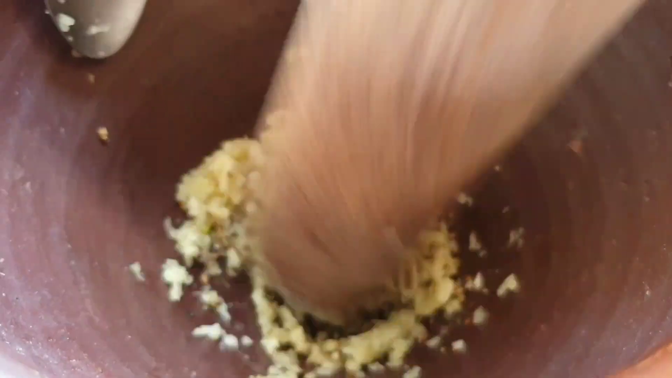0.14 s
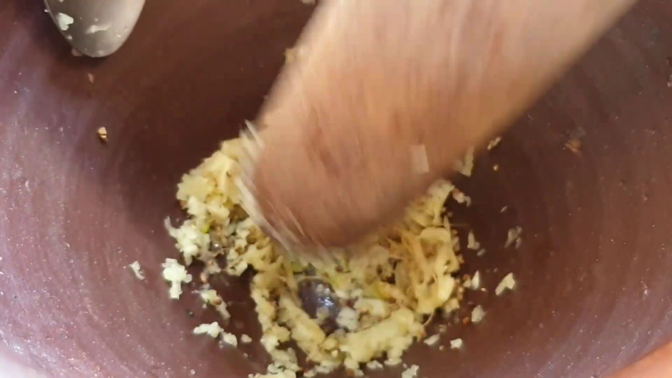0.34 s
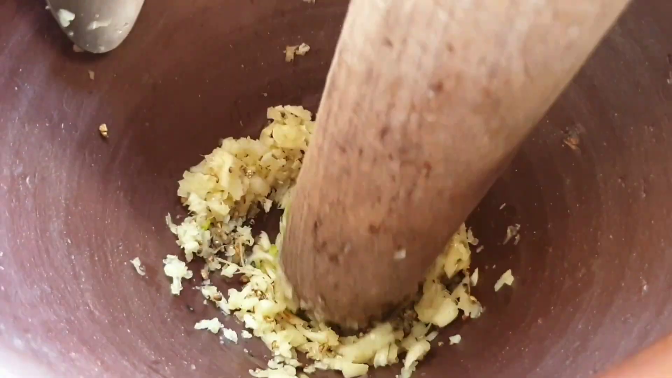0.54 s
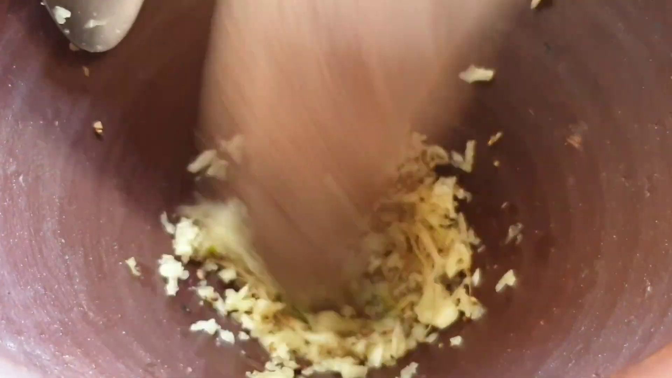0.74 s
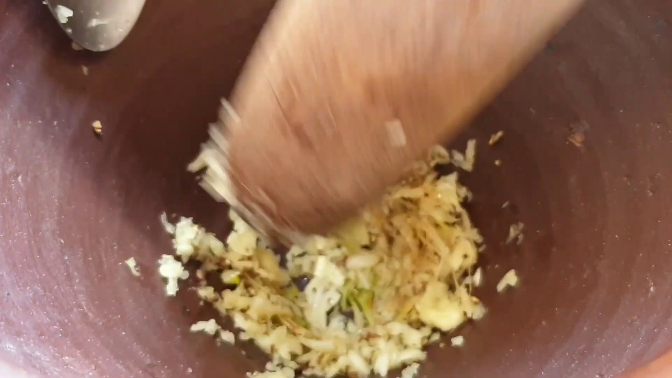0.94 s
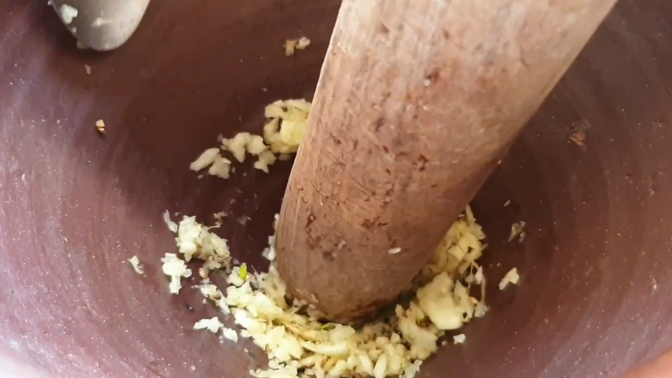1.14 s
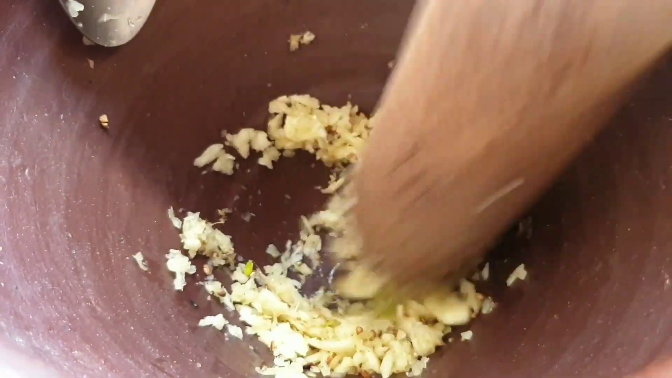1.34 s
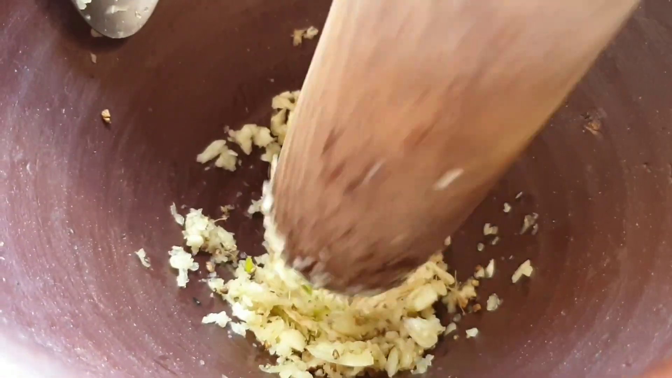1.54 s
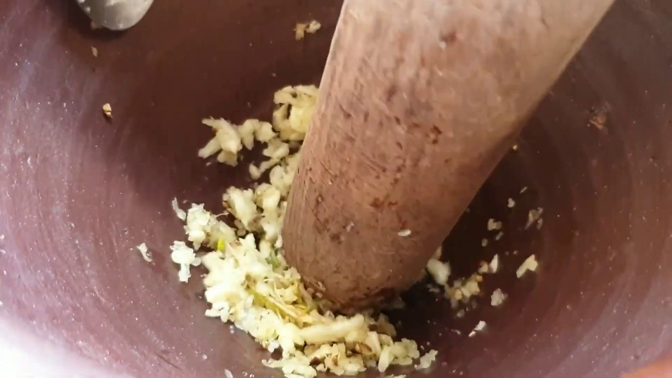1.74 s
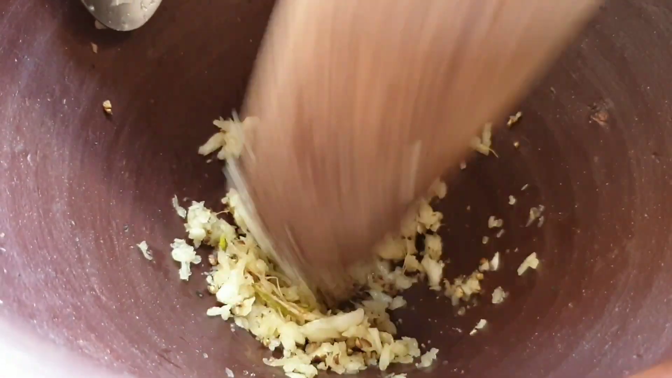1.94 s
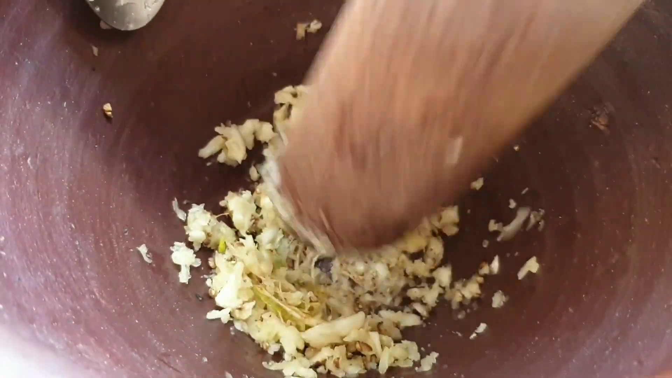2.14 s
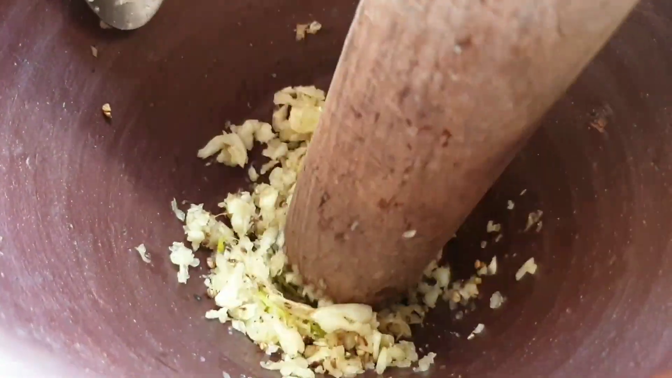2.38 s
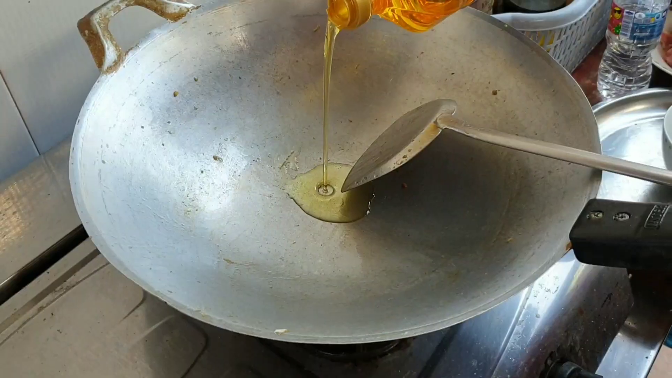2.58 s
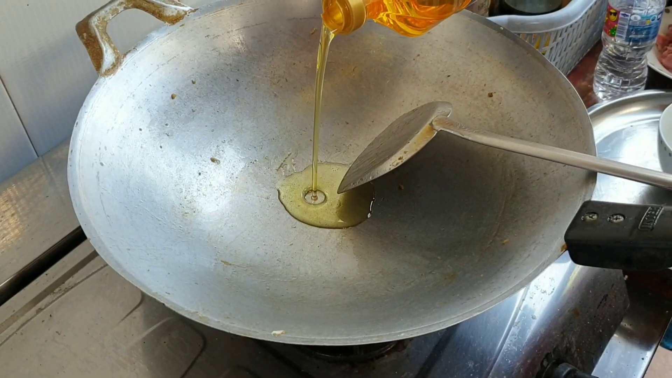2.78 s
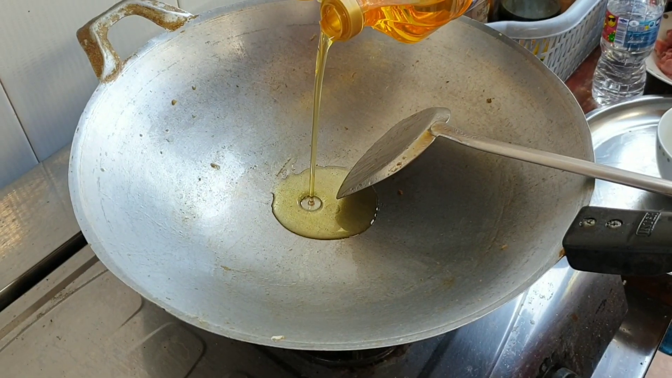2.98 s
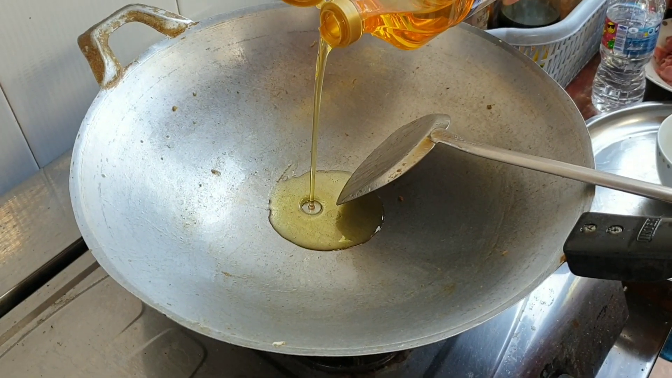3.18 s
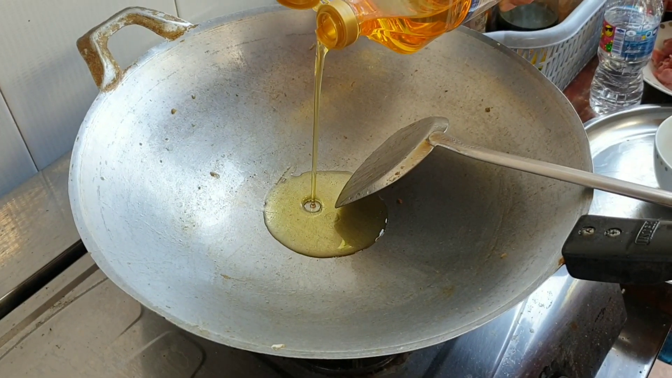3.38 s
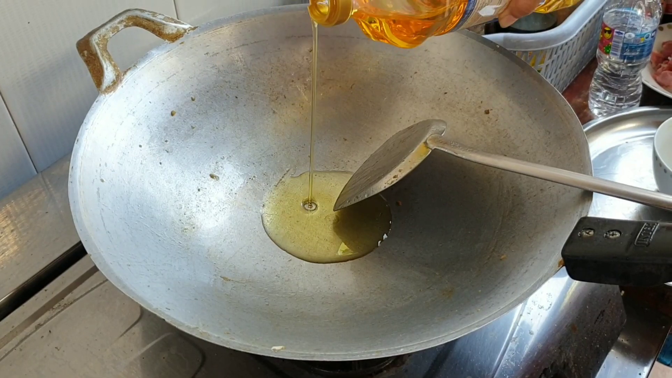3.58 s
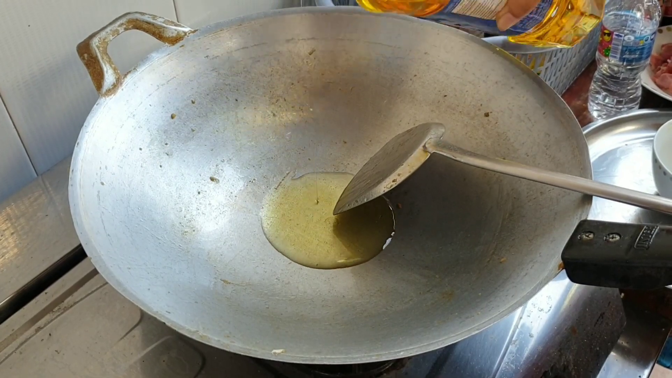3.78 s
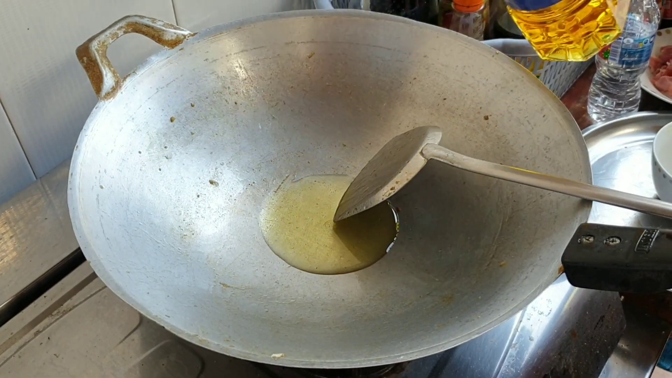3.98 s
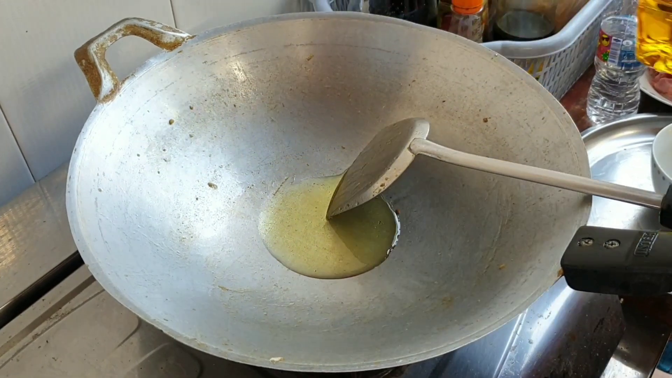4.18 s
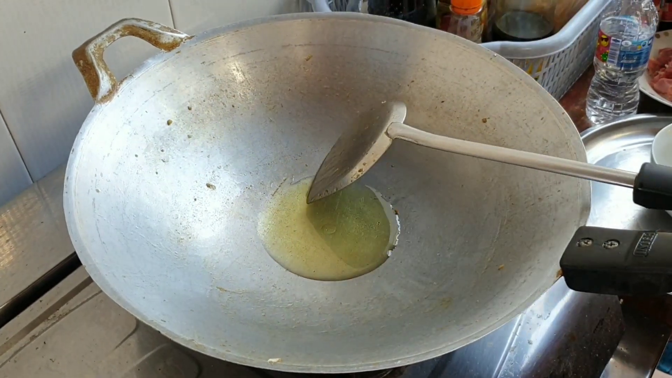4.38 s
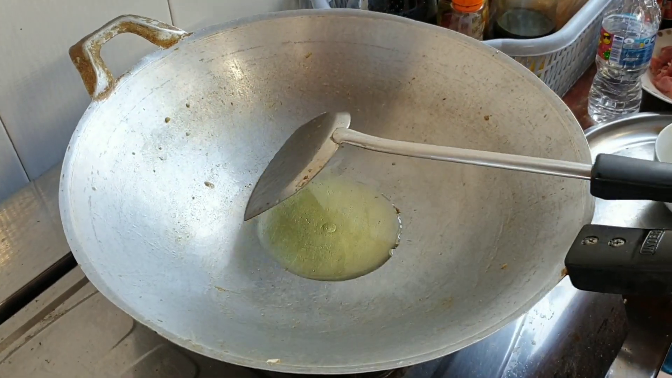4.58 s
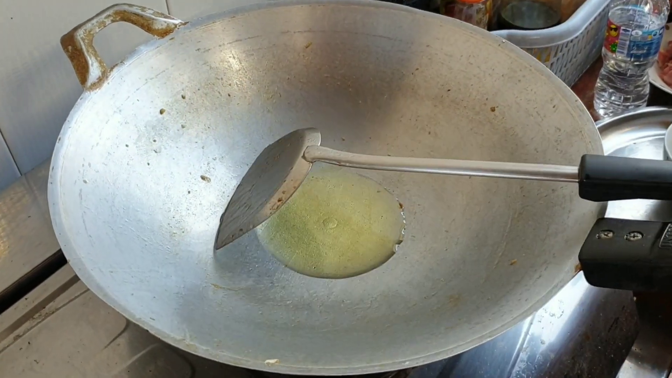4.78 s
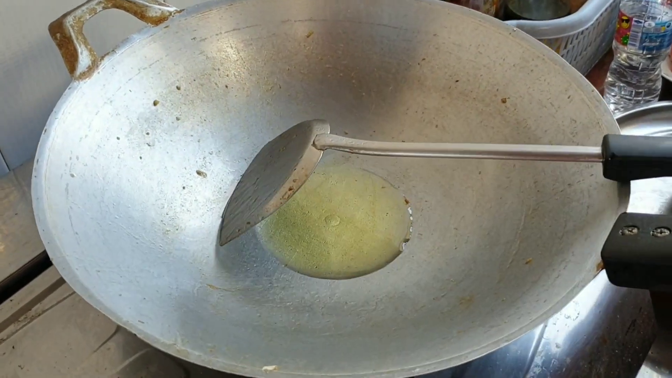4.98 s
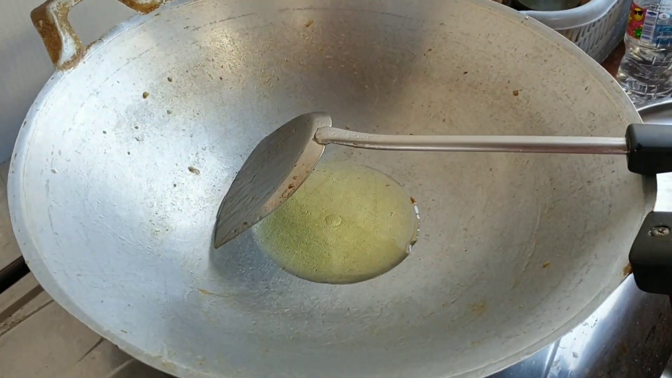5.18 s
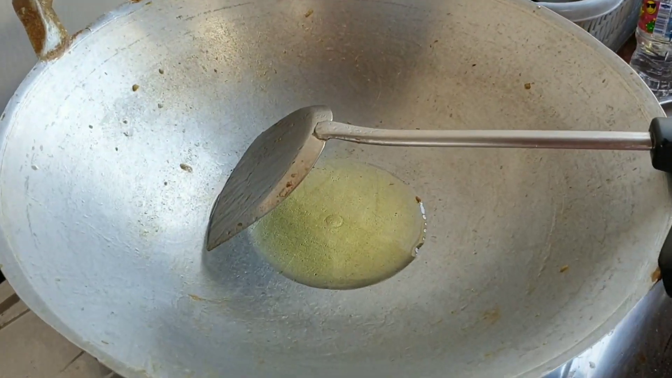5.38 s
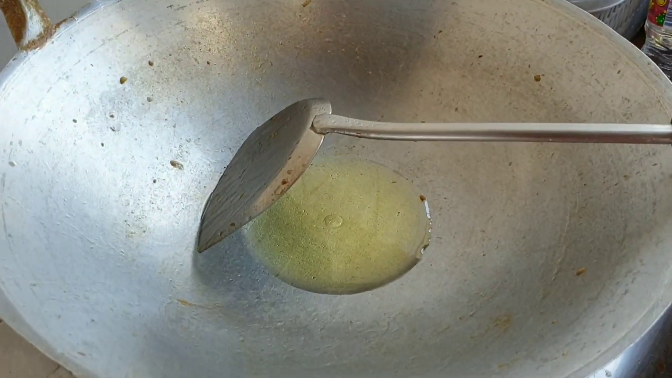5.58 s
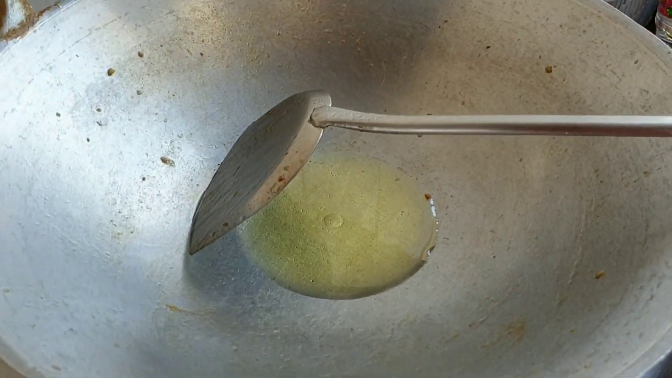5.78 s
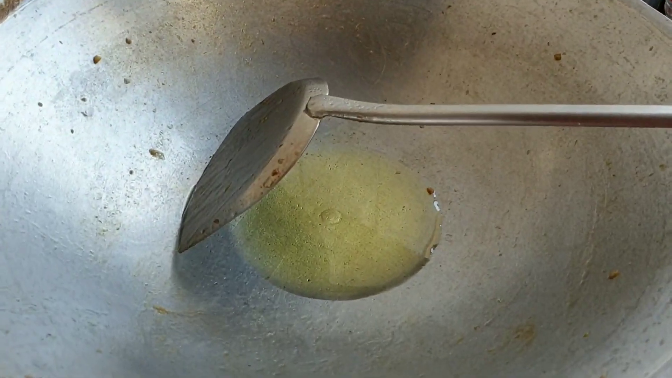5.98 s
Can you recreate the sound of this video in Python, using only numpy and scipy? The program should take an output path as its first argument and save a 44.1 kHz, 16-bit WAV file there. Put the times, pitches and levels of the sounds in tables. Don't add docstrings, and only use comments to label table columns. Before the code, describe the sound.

Nine regular pestle blows land in a clay bowl, woody and thudding, shaking the counter while garlic bursts and squirts. A sudden cut leaves distant traffic, a faint motor hum and lively sparrow chatter with yard echoes. Light ticks of a spatula on thin metal follow, then two loud clattering knocks and a last short one. The kitchen is dry, the stereo microphone near.

```python
import sys
import numpy as np
from scipy import signal
from scipy.fft import rfft, irfft, next_fast_len
from scipy.io import wavfile
from scipy.ndimage import map_coordinates

SR = 44100
rng = np.random.default_rng(int(sys.argv[2]) if len(sys.argv) > 2 else 0)


def materialize(psi):
    bounded = np.clip(np.atleast_2d(psi).T, -1, 1)
    quanta = np.round(bounded * 32767).astype(np.int16)
    wavfile.write(sys.argv[1], SR, quanta)


def gain_from_decibels(decibels):
    exponent = np.asarray(decibels, float) / 20
    return 10 ** exponent


N = 265923

MORTAR_ENDS_S, WOK_STARTS_S = 2.551, 2.578
PORT_LAG_S, YARD_T60_S = 0.0002179, 0.42
# frequency_hz, likeness (0 to 1)
PORT_LIKENESS = [(60, 0.94), (180, 0.93), (550, 0.054), (1650, 0.15), (4970, 0.014), (15000, 0.03)]
# frequency_hz, t60_s
KITCHEN_T60 = [(60, .4), (250, .3), (1000, .33), (4000, .3), (12000, .2)]

# frequency_hz, level_db (per Hz)
TOWN_SPECTRUM = [(15, -47.5), (25, -46.5), (44, -9.5), (64, -4), (114, -17), (170, -21), (249, -24.5),
                 (317, -25.5), (700, -28.5), (1020, -26.5), (1560, -32.5), (2280, -35), (3160, -41),
                 (7600, -41.5), (8400, -50), (16000, -51)]
# time_s, rumble_db
RUMBLE_CURVE = [(0, -65), (.37, -56), (.9, -59.5), (1.35, -49.5), (1.6, -50.5), (2.1, -56.5), (2.5, -44),
                (2.7, -53.5), (3.15, -50.5), (3.52, -54.5), (4.24, -48), (4.8, -50.5), (4.95, -42.5),
                (5.27, -44), (5.5, -50.5), (6.03, -50)]
# time_s, pitch_hz, level_db (rms)
FAR_MOTOR = [
    (2.58, 150.2, -62),
    (2.85, 149.3, -54.5),
    (3.15, 144.4, -62),
    (3.4, 139.1, -83.5),
    (5.2, 154.3, -72),
    (5.6, 156, -57),
    (6.03, 153.7, -60),
]

# start_s, length_s, level_db (rms)
FLOCK_BOUTS = [
    (2.56, 0.12, -62.5),
    (2.76, 0.5, -53),
    (3.78, 0.47, -51.5),
    (4.4, 0.89, -49.5),
    (5.72, .3, -53),
]
# start_s, length_s, middle_pitch_hz, level_db
DIVES = [(2.556, 0.022, 3770, -64), (1.7, 0.043, 3500, -53), (2.724, 0.13, 3700, -66.5),
         (3.28, 0.046, 2380, -64.5), (3.745, 0.062, 3680, -61), (4.07, 0.015, 5650, -55),
         (4.527, 0.065, 2533, -63.5), (4.625, 0.052, 3930, -57.5), (5.199, .085, 4276, -59),
         (5.701, 0.063, 3960, -52), (5.794, 0.047, 3450, -60), (5.87, 0.078, 2900, -67.5)]
SLURS = [(3.722, 0.0376, 4680, -57), (.926, 0.052, 4590, -61), (.975, 0.04, 3350, -63),
         (2.851, 0.14, 2337, -71.5), (3.083, 0.075, 2016, -68.5), (3.9, 0.12, 3870, -59),
         (3.76, 0.13, 4530, -66), (4.431, 0.06, 4740, -64), (4.673, 0.075, 3260, -67),
         (4.855, 0.092, 3845, -58.5), (5.42, 0.1, 4380, -71)]
LIFTS = [
    (1.38, 0.019, 3950, -67.5),
    (1.752, .025, 3190, -71),
    (4.736, 0.021, 4940, -53),
    (5.272, 0.11, 4816, -59.5),
    (5.388, 0.027, 4830, -56),
]
FLICKS = [
    (1.675, 0.017, 3980, -48.5),
    (5.676, 0.031, 4160, -54),
    (5.74, .036, 2728, -58.5),
]
HOLDS = [(.15, .06, 5930, -82), (.16, 0.037, 4300, -83), (.21, 0.084, 5200, -83), (.375, 0.037, 4480, -63),
         (.42, 0.14, 3290, -79.5), (2.954, 0.04, 5900, -64), (2.985, 0.091, 5200, -60.5),
         (3.05, .07, 5070, -59.5), (3.06, 0.083, 4480, -65), (2.78, .06, 5910, -75),
         (1.658, 0.011, 5460, -65), (1.918, 0.094, 5360, -83.5), (2.163, 0.07, 5600, -71.5),
         (5.41, 0.027, 5180, -57.5), (2.73, 0.031, 2795, -69), (3.197, 0.091, 4535, -73),
         (3.797, 0.035, 3370, -59.5), (4.05, 0.02, 6040, -65), (4.359, 0.092, 6080, -62.5),
         (4.455, 0.08, 5860, -60), (4.659, 0.027, 5820, -57)]
WHISTLES = [
    (4.138, 0.035, 5010, -54.5),
]

# start_s, peak_db, brightness_db_per_octave
GRIT_TICKS = [(3.752, -48, -10), (3.841, -40, 0), (4.092, -35.5, 1.5), (4.128, -48, -1), (4.162, -42, -4),
              (4.292, -43, 1.5), (4.417, -49, 1.5), (5.037, -26, 1), (5.066, -29, -0.3), (5.08, -30.5, -1),
              (5.088, -25, 11), (5.115, -35, -4.5), (5.873, -46, 4.5), (5.933, -40, 2.5)]
# start_s, length_s, hiss_db
SLIDES = [
    (2.95, 0.17, -71),
    (3.88, 0.18, -76),
    (4.45, 1, -75.5),
    (5.62, .25, -73.5),
    (5.86, .08, -66.5),
]
# frequency_hz, level_db (per Hz)
SLIDE_SPECTRUM = [(2000, -14.5), (5000, -1), (7500, -6.5), (11000, -15), (14000, -15.5), (16000, -23.5)]
# start_s, swell_s, t60_s, level_db (rms), brightness_db_per_octave
WOK_KNOCKS = [(3.11, 0.025, 0.42, -53, -0.5), (3.752, 0.00079, 0.049, -49.5, 1),
              (3.843, 0.00078, 0.03, -44.5, 3.5), (4.093, 0.00071, 0.018, -36, 1),
              (4.11, 0.013, 0.41, -42.5, -0.5), (4.1, 0.019, 0.99, -50.5, -17.5),
              (4.293, 0.00053, 0.069, -46.5, -2.5), (4.31, 0.0042, 0.105, -60.5, 8.5),
              (4.815, 0.00058, 0.026, -18, -4.5), (4.82, 0.0012, 0.2522, -38, -14),
              (5.034, 0.00036, 0.042, -17, 0), (5.045, 0.036, 0.037, -27, -3.5),
              (5.935, 0.0024, 0.013, -43.5, 1), (5.86, 0.14, 0.14, -56.5, 25),
              (5.997, 0.0052, 0.017, -21, 1.5), (6.008, 0.0026, 0.057, -54, -8)]
# frequency_hz, level_db (per Hz)
CLATTER_SPECTRUM = [(120, -25), (250, -3), (1000, 4.5), (1900, 1.7), (2500, -7), (3200, -3), (5000, -0.5),
                    (7500, -11), (11000, -17.5), (16000, -29)]
# pitch_hz, level_db, t60_s
NEAR_RIM = [(307, -39, .45), (415, -36, .3), (520, -38, .25), (624, -37, .3), (727, -33, .8),
            (1776, -39, .12), (2239, -36, .15), (2708, -37, .1), (4100, -44, .08)]
NEAR_BASE = [(291, -46, .4), (510, -41, .35), (624, -38, .4), (732, -38, .25), (856, -40, .4),
             (1179, -39, .4), (1453, -34, .6), (1906, -37, .15), (3214, -42, .17), (3941, -46, .2),
             (4328, -45, .18), (5039, -40, .15), (5701, -42, .12)]
LIGHT_TOUCH = [(2239, -59, .08)]
LAST_KNOCK = [(1060, -26, 0.071), (1305, -24, .05), (1620, -19, 0.02)]

# start_s, peak_db, brightness_db_per_octave
RIM_TAPS = [
    (.047, -28.5, -6),
    (.365, -30.5, 1),
    (.671, -31, -0.5),
    (.972, -31, -2.5),
    (1.638, -49.5, -2.5),
    (2.490, -33, 1),
    (2.513, -37, -3),
]
# pitch_hz, level_db, t60_s
RIM_MODES = [(1016, -12, .25), (1577, -16, .06), (2040, -10, .03), (2638, 2, .1), (2756, -1, .07),
             (3300, -10, .05), (4290, -18, .12), (4657, -18, .09), (5000, -3, .012), (5943, -7, .03),
             (6255, -11, .04)]
# pitch_hz, level_db, t60_s
LATE_TAP_MODES = [(4231, -35, .09), (4560, -40, .07)]

# start_s, swell_s, t60_s, level_db (rms), treble_db
CRUSHES = [(0, 0.00032, 0.062, -25.5, -10), (.288, 0.013, 0.012, -16.5, -3.5),
           (.302, 0.0038, 0.025, -33.5, -4.5), (0.578, 0.019, 0.054, -30.5, -2),
           (.598, 0.0086, .02, -27, -0.5), (.607, 0.0073, .015, -29.5, -3), (.864, 0.015, 0.06, -35, -5.5),
           (0.886, 0.0069, 0.05, -32, 0), (.896, 0.006, .02, -30, -3.5), (.903, 0.0033, .04, -35.5, 0.5),
           (1.184, 0.01, 0.03, -25.5, 2), (1.199, 0.0067, 0.017, -19.5, -2),
           (1.207, .003, 0.037, -30, -1.5), (1.475, 0.0037, 0.08, -37.5, -1.5),
           (1.495, 0.016, 0.057, -33.5, -4), (1.518, 0.0074, 0.026, -35.5, -5),
           (1.777, 0.0044, 0.1, -30, -6.5), (1.796, 0.0053, 0.024, -24, -4), (1.805, 0.003, .03, -30, -4),
           (2.102, 0.0056, 0.033, -21.5, -3), (2.119, 0.0068, 0.088, -29, -8),
           (2.404, 0.021, 0.012, -20, -4), (2.424, 0.0039, 0.085, -35.5, -2.5),
           (2.435, 0.012, 0.78, -49.5, -0.5)]
# frequency_hz, level_db (per Hz)
CRUNCH_SPECTRUM = [(710, -12.5), (1200, -10), (1400, -10), (1810, -9), (3290, -4), (4360, 1), (5350, -5.5),
                   (8440, -14), (10600, -6.5), (15000, -19.5), (16000, -28)]
# start_s, peak_db, pitch_hz, t60_s
SQUIRTS = [(0.2984, -20, 10800, .008), (0.602, -32, 11000, .02), (.9, -29.5, 3200, .008),
           (1.193, -29.5, 11500, .006), (1.203, -27, 11100, .015), (1.315, -36.5, 8200, 0.013),
           (1.316, -46.5, 12500, .015), (1.8, -14.5, 11000, 0.0087), (1.807, -24.5, 10850, .008),
           (2.107, -16, 11000, 0.0086), (2.4235, -22.5, 11500, .008)]

# start_s, thud_db, counter_db, bowl_db, thud_brightness_db_per_octave
BLOWS = [(0.003, -23, -26, -31, -5.5), (0.299, -17.5, -23.5, -14.5, 0.5), (0.615, -38.5, -35.5, -33, 4),
         (0.882, -56, -37.5, -53, -2.5), (0.909, -34, -30, -31.5, -0.5), (1.19, -14, -22.5, -16.5, -1.5),
         (1.206, -34.5, -33, -30, -7.5), (1.477, -24.5, -35, -21.5, 4), (1.778, -26, -30.5, -27.5, 5.5),
         (1.805, -41.5, -31.5, -27.5, -4), (2.107, -10.5, -22, -25, 0.5), (2.118, -42, -20, -12.5, -6),
         (2.422, -12, -18.5, -21, 0.2), (2.444, -40, -39, -24.5, -15)]
# start_s, bending_db, overtone_db, sideways_db
BARE_BLOWS = [
    (.004, -36, -35.5, -39),
    (1.191, -14.5, -23.5, -30.5),
    (1.209, -31, -38, -38),
    (1.479, -13.5, -34, -21),
    (1.4819, -9.5, -37, -21),
    (1.495, -28.5, -28.5, -31),
    (1.532, -32, -44.5, -36),
    (1.779, -28.5, -18.5, -28.5),
    (1.801, -42.5, -25, -41),
    (2.108, -22.5, -33, -32.5),
]
# frequency_hz, level_db (per Hz)
THUD_SPECTRUM = [(60, -34), (150, -12.5), (215, -7.5), (290, 9.5), (500, 1), (800, 0), (1200, -4.5),
                 (2000, -8.5), (4000, -26.5), (16000, -65.5)]
# pitch_hz, level_db, t60_s
COUNTER_MODES = [(52, -3.5, 0.14), (60.9, -3, 0.16), (107.4, 6, 0.061), (119.9, 0.5, 0.2)]
BOWL_MODES = [(194.6, -7.5, 0.094), (279.6, -4, 0.083), (338.5, -7, 0.2126), (480, 3, 0.043),
              (503, -1, 0.092)]
WALL_MODES = [(760, -8, .06), (840, -8, .05), (1370, -16, .04)]
PESTLE_MODES = [(1174, 0, .105), (1017, -20, .15), (1120, -26, .2), (1225, -30, .3)]
OVERTONE_MODE = [(3240, -1, .065)]
SIDEWAYS_MODES = [(1300, 0, .04), (1390, -4, .035), (1560, -10, .03)]
DISH_MODES = [(4786, -28, .08), (6132, -31, .08), (7600, -35, .025), (11173, -31, .09), (13300, -36, .08),
              (15200, -42, .06)]


def lowpass(x, hz, order):
    return signal.sosfilt(signal.butter(order, hz, fs=SR, output="sos"), x)


def highpass(x, hz, order):
    return signal.sosfilt(signal.butter(order, hz, "high", fs=SR, output="sos"), x)


def rms_one(x):
    return x / np.sqrt(np.mean(x ** 2) + 1e-20)


def in_time(rows):
    s, *columns = np.transpose(rows)
    return [np.interp(np.arange(N) / SR, s, c) for c in columns]


def at_hz(points, hz):
    table_hz, value = np.transpose(points)
    return np.interp(np.log(hz + 1), np.log(table_hz), value)


def colour(x, spectrum):
    length = x.shape[-1]
    size = next_fast_len(length)
    gain = gain_from_decibels(at_hz(spectrum, np.fft.rfftfreq(size, 1 / SR)))
    return irfft(rfft(x, size) * gain, size)[..., :length]


def tilted(x, db_per_octave):
    return rms_one(colour(x, [(125, -3 * db_per_octave), (16000, 4 * db_per_octave)]))


def diffuse(size):
    mid, side = rfft(rng.standard_normal((2, size)))
    alike = np.clip(at_hz(PORT_LIKENESS, np.fft.rfftfreq(size, 1 / SR)), 0, 1)
    return irfft(np.sqrt(1 + alike) * mid + np.sqrt(1 - alike) * side * [[1], [-1]], size)


def drift(rate_hz):
    knots = rng.standard_normal(int(N / SR * rate_hz) + 3)
    return rms_one(map_coordinates(knots, [np.arange(N) / SR * rate_hz], order=3))


def grains(per_s, spread_db):
    sizes = gain_from_decibels(spread_db * np.minimum(rng.exponential(1, N), 5)) * rng.choice([-1, 1], N)
    return rms_one(sizes * (rng.random(N) < per_s / SR))


def strike(times_s, db, modes, tilt_db=0, scatter_db=0, push=(1.,)):
    out = np.zeros(N)
    luck = rng.standard_normal((len(times_s), len(modes)))
    at = np.round(np.asarray(times_s) * SR).astype(int)
    for k, (hz, mode_db, t60_s) in enumerate(modes):
        clicks = np.full(N, 1e-18)
        clicks[at] += gain_from_decibels(db + mode_db + tilt_db * np.log2(hz / 1000) + scatter_db * luck[:, k])
        r = gain_from_decibels(-60 / (t60_s * SR))
        w = 2 * np.pi * hz / SR
        out += signal.lfilter([0, np.sin(w)], [1, -2 * r * np.cos(w), r * r], clicks)
    return signal.lfilter(push, [1], out)


def bursts(rows, tinted):
    out = np.zeros(N)
    for s, swell_s, t60_s, db, tint in rows:
        at = slice(round(s * SR), min(round((s + swell_s + t60_s) * SR), N))
        t = np.arange(at.stop - at.start) / SR
        fall_db = db - 60 * np.maximum(t - swell_s, 0) / t60_s
        out[at] += np.minimum(t / swell_s, 1) ** 2.8 * gain_from_decibels(fall_db) * tinted(at, tint)
    return out


def bouts(rows, rise_s, fall_s):
    t = np.arange(N) / SR
    gain = np.zeros(N)
    for s, length_s, db in rows:
        rise = np.clip((t - s) / rise_s, 0, 1) ** 2
        fall = np.clip(1 + (s + length_s - t) / fall_s, 0, 1) ** 2
        gain += gain_from_decibels(db) * rise * fall
    return gain


def reverb(x, t60_table, gap_s):
    size = SR // 2
    noise, t, tail = rfft(diffuse(size)), np.arange(size) / SR, 0
    octave = np.log2(np.fft.rfftfreq(size, 1 / SR) + 1)
    for centre in range(5, 15):
        band = irfft(noise * np.clip(1 - abs(octave - centre), 0, 1), size)
        t60_s = at_hz(t60_table, 2. ** centre)
        tail = tail + band * gain_from_decibels(-60 * t / t60_s) / np.sqrt(t60_s * SR / np.log(1e6))
    tail = tail * np.clip(t / gap_s, 0, 1) ** 2
    return signal.fftconvolve(x[None], tail, axes=1)[:, :N]


def ports(x, pan_db, lags=1):
    late = np.interp(np.arange(N) - lags * PORT_LAG_S * SR, np.arange(N), x)
    return np.array([x * gain_from_decibels(pan_db / 2), late * gain_from_decibels(-pan_db / 2)])


def town():
    t = np.arange(N) / SR
    rumble_db, = in_time(RUMBLE_CURVE)
    wash_db = -63 + 0.93 * (rumble_db + 51)
    wash_db += 3 * (t > MORTAR_ENDS_S)
    air = colour(diffuse(N), TOWN_SPECTRUM)
    rumble = rms_one(lowpass(air, 220, 4))
    wash = lowpass(rms_one(highpass(air, 220, 4)), 1500, 4)
    steady_hush = rms_one(highpass(air, 1500, 4))
    hz, db = in_time(FAR_MOTOR)
    motor = gain_from_decibels(db + 4.0 + 1.9 * drift(14)) * np.sin(2 * np.pi * np.cumsum(hz) / SR) * (t > WOK_STARTS_S)
    both = rumble * gain_from_decibels(rumble_db + 0.44 * drift(53))
    both += wash * gain_from_decibels(wash_db + 1.9 * drift(2.7))
    both += gain_from_decibels(-69.5) * steady_hush + motor
    return both * gain_from_decibels([[1.5], [-1.5]])


def flock():
    birds = np.zeros(N)
    for centre_hz in np.geomspace(2400, 5000, 10):
        hz = centre_hz * 2 ** (.3 * np.tanh(drift(20)) + .05 * drift(300))
        birds += gain_from_decibels(4 * drift(12)) * np.sin(2 * np.pi * np.cumsum(hz) / SR)
    far = rms_one(birds) * bouts(FLOCK_BOUTS, rise_s=0.057, fall_s=0.26) * gain_from_decibels(-3.0)
    return reverb(far, [(100, 0.21), (9000, 0.29)], gap_s=0.015)


def sparrows():
    out, husk, flutter = np.zeros(N), drift(300), drift(90)
    shapes = [(DIVES, -13.0, .05), (SLURS, -4.0, .05), (LIFTS, 8.0, .05), (FLICKS, 26.0, .05),
              (HOLDS, 0, .035), (WHISTLES, 0, 0)]
    for calls, oct_per_s, husk_share in shapes:
        for s, length_s, middle_hz, db in calls:
            at = slice(round(s * SR), round((s + length_s) * SR))
            u = np.linspace(0, 1, at.stop - at.start)
            hz = middle_hz * 2 ** (oct_per_s * length_s * (u - .5)) * (1 + husk_share * husk[at])
            loudness = gain_from_decibels(db + 2.9 * flutter[at]) * np.sin(np.pi * u) ** 0.67
            out[at] += loudness * np.sin(2 * np.pi * np.cumsum(hz) / SR)
    direct = ports(out, 1.5, lags=-1.5) * gain_from_decibels(-9)
    echoes = reverb(out, [(100, YARD_T60_S), (9000, YARD_T60_S * 1.3)], gap_s=0.0027)
    return direct + gain_from_decibels(14.0) * echoes


def grit():
    white = colour(rng.standard_normal(N), [(400, -20), (1500, -0.2), (9000, -5.5), (16000, -24.5)])
    rows = [(s, .0005, .008, db - 7, tilt) for s, db, tilt in GRIT_TICKS]
    return bursts(rows, lambda at, tilt: tilted(white[at], tilt))


def wok():
    clatter = rms_one(colour(grains(6400, 3.7), CLATTER_SPECTRUM))
    out = bursts(WOK_KNOCKS, lambda at, tilt: tilted(clatter[at], tilt))
    out += strike([4.816], 0, NEAR_RIM)
    out += strike([5.036, 5.061], -0.44, NEAR_BASE, scatter_db=-0.5)
    out += strike([5.998, 6.009], np.array([0, -3.0]), LAST_KNOCK)
    out += strike([3.843, 3.926], 0, LIGHT_TOUCH)
    hiss = rms_one(colour(grains(6000, 1.3), SLIDE_SPECTRUM))
    hiss *= bouts(SLIDES, rise_s=0.041, fall_s=0.13) * gain_from_decibels(5.5)
    return out + hiss * (np.arange(N) / SR > WOK_STARTS_S)


def rim_taps():
    s, peak_db, bright = np.transpose(RIM_TAPS)
    glancing = strike(s, peak_db - 4, RIM_MODES, tilt_db=bright + 3)
    full_touch = strike(s + .0035, peak_db, RIM_MODES, tilt_db=bright - 5.5)
    late_ring = strike([2.514], 0, LATE_TAP_MODES)
    return lowpass(glancing + full_touch + late_ring, 7200, 6)


def garlic():
    crackle = rms_one(colour(grains(12000, 2.6), CRUNCH_SPECTRUM))
    treble = highpass(crackle, 7500, 4)
    crushed = bursts(CRUSHES, lambda at, treble_db: crackle[at] + (gain_from_decibels(treble_db) - 1) * treble[at])
    crushed *= gain_from_decibels(2.1 * drift(300))
    jet = rng.standard_normal(N)

    def squeak(at, hz):
        band = signal.butter(2, [hz * .9, hz * 1.1], "band", fs=SR, output="sos")
        return rms_one(signal.sosfilt(band, jet[at]))

    return crushed + bursts([(s, .0012, t60_s, db - 4.5, hz) for s, db, hz, t60_s in SQUIRTS], squeak)


def pounding():
    s, thud, counter, bowl, bright = np.transpose(BLOWS)
    slow, medium, quick = [np.hanning(count) / count * 2 for count in (260, 70, 24)]
    out = strike(s, counter + 3.2, COUNTER_MODES, scatter_db=2.5, push=slow)
    out += strike(s, bowl + 0.5, BOWL_MODES, scatter_db=3.0, push=medium)
    out += strike(s, thud - 1.5, WALL_MODES, scatter_db=0.5, push=quick)
    dull = rms_one(colour(grains(6000, 2.3), THUD_SPECTRUM))
    thuds = [(at, .003, .11, db - 2.5, tilt) for at, db, tilt in zip(s, thud, bright)]
    shaking = [(at, .012, .4, db - 19, tilt + 1.5) for at, db, tilt in zip(s, thud, bright)]
    out += bursts(thuds + shaking, lambda at, tilt: tilted(dull[at], tilt))
    s, bending, overtone, sideways = np.transpose(BARE_BLOWS)
    out += strike(s, bending, PESTLE_MODES)
    out += strike(s, overtone, OVERTONE_MODE)
    out += strike(s, sideways, SIDEWAYS_MODES)
    out += strike([2.125], 0, DISH_MODES)
    return highpass(out, 42, 2)


def scene():
    t = np.arange(N) / SR
    outside = sparrows() + town()
    steel = wok()
    pan = ports(steel, 4.0, lags=1.36) + ports(grit(), 3.0, lags=0.43)
    pan += gain_from_decibels(-2.5) * reverb(steel, KITCHEN_T60, gap_s=0.00091)
    taps, crackle, blows = rim_taps(), garlic(), pounding()
    mortar = ports(crackle, 5.0, lags=1.6) + ports(blows, 6.8) + ports(taps, 4.2, lags=-0.61)
    to_room = gain_from_decibels(-12.5) * (blows + taps) + gain_from_decibels(-15.0) * crackle
    mortar += reverb(to_room, KITCHEN_T60, gap_s=0.0029)
    before = np.clip((MORTAR_ENDS_S - t) / 0.00083, 0, 1)
    after = np.clip((t - WOK_STARTS_S) / 0.0023, 0, 1)
    return (mortar + outside) * before + (pan + outside + flock()) * after


def band_limit(x):
    return signal.sosfilt(signal.butter(12, 16540, fs=SR, output="sos"), x)


def record(dry):
    heard = lowpass(highpass(dry, 47, 3), 15700, 12)
    return band_limit(np.clip(heard, -1, 1))


dry = scene()
out = record(dry)
materialize(out)
```